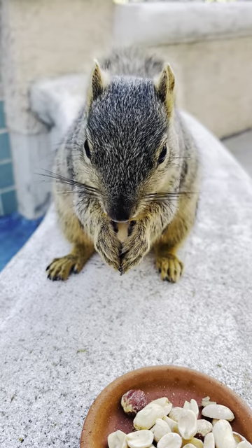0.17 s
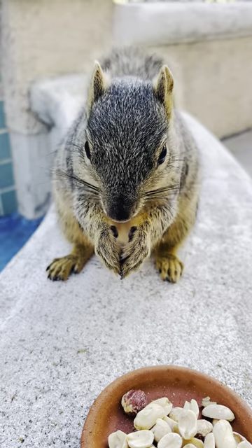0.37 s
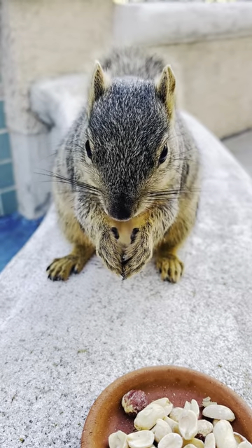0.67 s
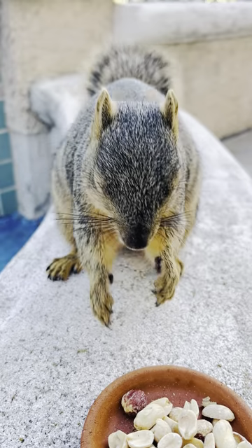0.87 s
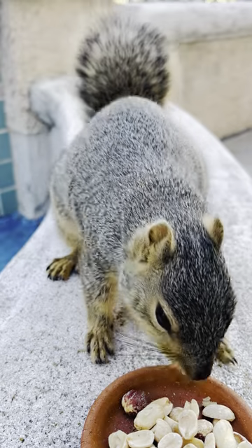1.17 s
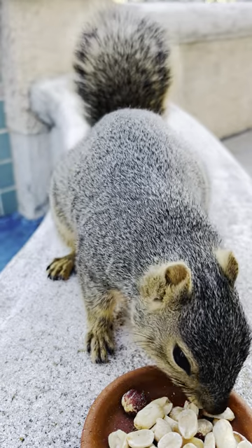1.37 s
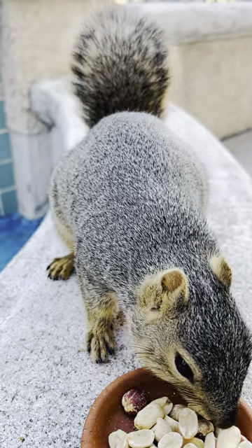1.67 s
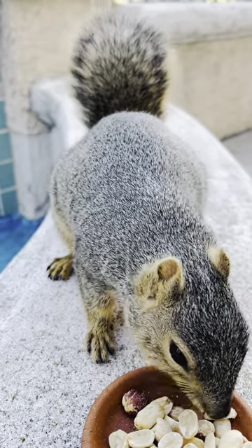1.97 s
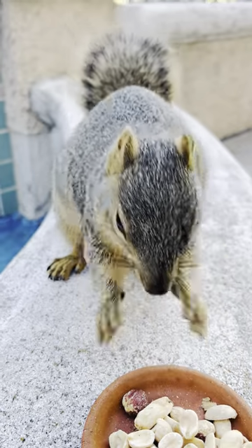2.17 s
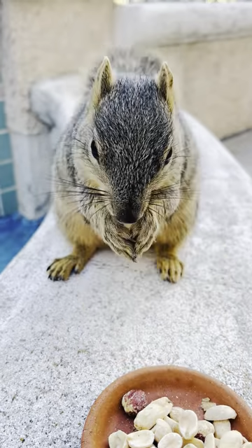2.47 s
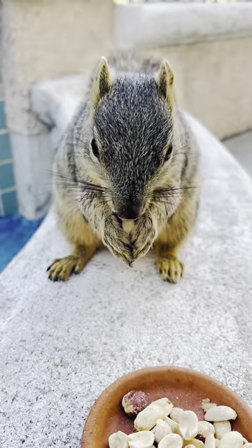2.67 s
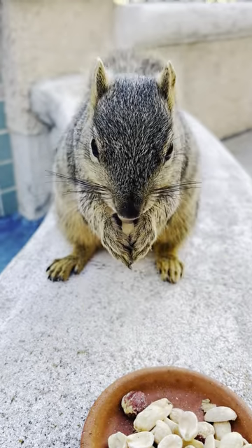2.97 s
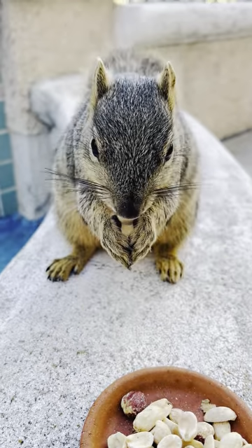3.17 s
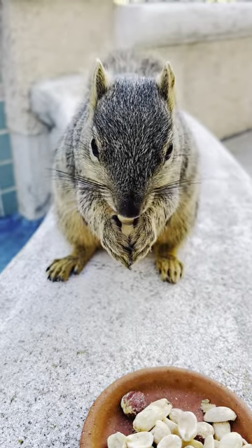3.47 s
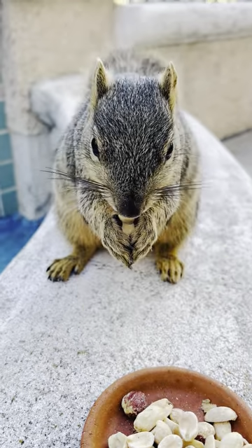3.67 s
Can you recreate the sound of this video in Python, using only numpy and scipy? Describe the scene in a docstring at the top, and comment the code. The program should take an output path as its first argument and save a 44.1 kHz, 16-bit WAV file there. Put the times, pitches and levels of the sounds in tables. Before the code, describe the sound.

A squirrel gnaws peanuts very close to stereo microphones, snapping kernels in brittle clusters, then nuts tap and scrape a clay dish midway before chewing resumes, over low outdoor rumble and faint hums on a patio.

```python
"""First comes a low outdoor rumble with hums; almost at once a squirrel gnaws peanuts close by.
Kernels snap in brittle clusters of noise bursts, its teeth rasp in tiny slips, and its mouth rings.
Midway it noses in a clay dish: nuts tap it as fading tones and scrape it as ringing friction.
Then it chews on. Nearby patio walls answer softly with fading noise."""
import sys
import numpy as np
from scipy import signal
from scipy.fft import rfft, irfft, next_fast_len
from scipy.io import wavfile
from scipy.ndimage import map_coordinates

SR = 44100
rng = np.random.default_rng(int(sys.argv[2]) if len(sys.argv) > 2 else 0)


def unload_wav(signal):
    """Save mono or channel-first audio to the path in sys.argv[1] as 16-bit WAV at rate SR, clipped to [-1, 1]."""
    wavfile.write(
        sys.argv[1],
        SR,
        np.round(np.clip(np.atleast_2d(signal).T, -1, 1) * 32767).astype(np.int16),
    )


N = 168903  # length of the scene in samples


def amp(db):
    """Turn decibels into an amplitude factor."""
    return 10 ** (np.asarray(db) / 20)


def unit(x):
    """Scale a sound to rms 1."""
    return x / np.sqrt(np.mean(x ** 2) + 1e-30)


def along(points, hz):
    """Read a curve of (frequency, value) points on a logarithmic frequency axis."""
    frequency, value = np.transpose(points)
    return np.interp(np.log(hz + 1), np.log(frequency + 1), value)


def wobble(rate):
    """A smooth random curve through `rate` random values a second."""
    knots = rng.standard_normal(int(N * rate / SR) + 4)
    return map_coordinates(knots, [np.arange(N) * rate / SR])


def filtered(x, response):
    """Shape a sound by a response (real or complex) at each frequency."""
    size = next_fast_len(N + SR // 2)
    hz = np.fft.rfftfreq(size, 1 / SR)
    return irfft(rfft(x, size) * response(hz), size)[..., :N]


def add(track, start_s, sound):
    """Mix a short sound into the track at a given time."""
    part = track[max(0, round(start_s * SR)):][:len(sound)]
    part += sound[:len(part)]


def fading_tone(hz, t60, t):
    """A sine that loses 60 dB in t60 seconds, as a damped body rings."""
    return np.sin(2 * np.pi * hz * t) * amp(-60 * t / t60)


SNAP_S = 0.003  # time over which a short sound's energy is counted


def sized(x, db):
    """Give a short sound the energy of that level held for one snap."""
    return x * amp(db) * np.sqrt(SNAP_S * SR / np.sum(x ** 2))


SPLINTER_T60, SPLINTER_DB = 0.021, -12.5  # s, dB against the break itself
COLOUR_SCATTER_DB = 3  # random change of colour from burst to burst


def burst(colour, t60, size=1024):
    """One fracture: fading noise with trailing splinters, through a colour that varies each time."""
    t, hz = np.arange(size) / SR, np.fft.rfftfreq(size, 1 / SR)
    fade = amp(-60 * t / t60) + amp(SPLINTER_DB - 60 * t / SPLINTER_T60)
    drive = rng.standard_normal(size) * fade
    scatter = signal.resample(rng.standard_normal(size=14), len(hz))
    # folding the cepstrum makes the colour causal: nothing sounds before the break
    cepstrum = irfft(np.log(amp(along(colour, hz) + COLOUR_SCATTER_DB * scatter)))
    cepstrum[1:size // 2] *= 2
    cepstrum[size // 2 + 1:] = 0
    return irfft(rfft(drive) * np.exp(rfft(cepstrum)))


GRAIN_SPREAD_DB = 5.5  # how unequal the slips are


def friction(strokes, response, rate):
    """Tiny slips, about `rate` a second, shake a body and swell with each stroke."""
    t = np.arange(N) / SR
    happens = rng.random(N) < rate / SR
    size = amp(GRAIN_SPREAD_DB * np.clip(rng.standard_normal(N), -2, 2))
    slips = happens * rng.choice([-1, 1], N) * size
    power = sum(amp(db) ** 2 * np.exp(-((t - s) / width) ** 2 * 2) for s, width, db in strokes)
    return np.sqrt(power) * unit(filtered(slips, response))


# snaps of the nut, levels before the trims below:
# (time [s], mouth ring [dB], body [dB], brittle edge [dB], splinter fizz [dB])
SNAPS = [(0.0881, -84, -81, -63.5, -60), (0.1049, -54.5, -60, -64, -60), (0.1112, -54.5, -64, -76, -73),
         (0.1171, -58, -65, -77, -72), (0.1926, -62, -62.5, -61, -67), (0.3518, -60, -80, -78, -75),
         (0.3793, -53, -55.5, -56.5, -55), (0.3861, -45, -64, -61, -61), (0.4435, -59, -80, -81, -71),
         (0.4656, -70, -65, -69, -60), (0.5533, -62, -68, -79, -68), (0.7126, -76, -72, -64, -61),
         (0.717, -53, -52, -55, -50), (0.721, -60, -59, -61, -53), (0.8508, -63, -73, -93, -89),
         (0.9, -66, -47.5, -44, -54), (0.9055, -54, -61, -67, -60), (0.9625, -80, -77, -71, -69),
         (1.022, -66, -75, -77, -67), (1.0785, -72, -57.5, -49, -59), (1.0818, -57.5, -75, -55, -50),
         (1.151, -73, -92, -89, -64), (1.2487, -69, -64, -65, -57), (1.2581, -67, -46, -47.5, -43.5),
         (1.2645, -62, -59, -71, -66), (1.4018, -80, -63.5, -76, -83), (1.4336, -72, -63, -72, -69),
         (1.4392, -59, -60.5, -57.5, -59), (1.445, -78, -65, -77, -80), (1.559, -80, -61.5, -76, -78),
         (1.8641, -56, -68, -87, -83), (1.9754, -60, -77, -91, -85), (2.4042, -54.5, -68, -58.5, -55),
         (2.4373, -75, -65.5, -67, -52), (2.4427, -79, -65, -63, -56), (2.4499, -80, -77, -65, -63),
         (2.5311, -62, -50, -52, -55), (2.562, -80, -69, -66, -51), (2.5658, -79, -62, -50, -62),
         (2.5747, -78, -73, -68, -63), (2.7722, -73, -84, -61, -57), (2.778, -53.5, -64, -59, -68),
         (2.8356, -80, -61, -63, -62), (2.876, -79, -85, -65, -62), (2.8801, -54, -66.5, -60, -56),
         (2.95, -56, -53, -62, -49.5), (2.9582, -65, -63, -70, -71), (3.067, -61, -81, -58, -62),
         (3.219, -62, -73, -57, -58), (3.2247, -56, -68, -61, -63), (3.2707, -64, -64, -67, -62),
         (3.2951, -58.5, -59, -70, -69), (3.3049, -56, -64, -69, -66), (3.3455, -80, -79, -66, -68),
         (3.396, -74, -80, -72, -57), (3.411, -54, -77, -57, -59), (3.415, -58, -57.5, -50.5, -48),
         (3.4177, -53, -63, -57, -48), (3.4564, -64, -65, -82, -58), (3.554, -56, -60.5, -78, -83),
         (3.6996, -74, -61, -64.5, -82), (3.7503, -74, -68, -60, -56), (3.7532, -66, -54.5, -48, -44),
         (3.7578, -50, -52.5, -50, -45), (3.766, -72, -78, -67, -65)]
# colours of the body, edge and fizz: (frequency [Hz], relative level [dB])
BODY_COLOUR = [(900, -34), (1700, -3), (3200, -5.5), (3900, -4), (4550, -0.5), (5500, -6), (6500, -2),
               (8000, -35.5)]
EDGE_COLOUR = [(4000, -47), (5800, -5.5), (6700, -2.5), (8200, -9), (9400, -3), (10700, 0.5), (11500, -6),
               (13000, -29), (16500, -32)]
FIZZ_COLOUR = [(5000, -33), (9500, -19), (11000, -5.5), (12000, 0.5), (13500, -0.5), (14500, -5),
               (15400, -5), (16000, -14), (16500, -29)]
MOUTH_HZ, MOUTH_SPREAD = 2330, 0.055  # middle pitch, its random spread as a fraction
MOUTH_T60, MOUTH_RISE_S = 0.0071, 0.00036  # s
BODY_T60, EDGE_T60, FIZZ_T60 = 0.0047, 0.0023, 0.0075  # s
MOUTH_DB, BODY_DB, EDGE_DB, FIZZ_DB = -3, -1.5, 1, -1.5  # trims added to the snap levels


def snaps():
    """Each fracture has a body, a brittle edge and a fizz of splinters, and rings the mouth."""
    out, t = np.zeros(N), np.arange(SR // 40) / SR
    rise = 1 - np.exp(-t / MOUTH_RISE_S)
    for s, mouth_db, body_db, edge_db, fizz_db in SNAPS:
        hz = MOUTH_HZ * np.exp(MOUTH_SPREAD * rng.standard_normal())
        mouth_ring = fading_tone(hz, MOUTH_T60, t) * rise
        add(out, s - MOUTH_RISE_S, sized(mouth_ring, mouth_db + MOUTH_DB))
        add(out, s, sized(burst(BODY_COLOUR, BODY_T60), body_db + BODY_DB))
        add(out, s, sized(burst(EDGE_COLOUR, EDGE_T60), edge_db + EDGE_DB))
        add(out, s, sized(burst(FIZZ_COLOUR, FIZZ_T60), fizz_db + FIZZ_DB))
    return out


# short knocks of the jaw under some bites: (time [s], pitch [Hz], level [dB])
JAW_KNOCKS = [(1.0787, 1600, -53.5), (1.2585, 1490, -54), (1.2644, 1880, -54.5), (2.5311, 1090, -48.5)]
KNOCK_T60 = 0.0098  # s


def jaw_knocks():
    """Under some bites the jaw knocks, as a quickly damped ring."""
    out, t = np.zeros(N), np.arange(SR // 40) / SR
    for s, hz, db in JAW_KNOCKS:
        add(out, s, sized(fading_tone(hz, KNOCK_T60, t), db))
    return out


# strokes of the teeth along the kernel:
# (time at the height [s], time from there to 1/e of the height [s], level [dB])
STROKES = [(.074, 0.0034, -69), (.114, 0.019, -64.5), (.148, .015, -74), (.29, 0.05, -76),
           (.46, 0.026, -70.5), (.492, 0.0089, -72), (.545, .004, -74), (.64, .015, -79),
           (.720, 0.0039, -64), (.82, 0.019, -75.5), (.905, 0.0098, -64), (.955, 0.013, -75),
           (1.083, 0.0088, -66), (1.11, .012, -90), (1.263, 0.009, -69), (1.455, 0.017, -75),
           (1.975, .025, -77), (2.51, 0.021, -73), (2.555, 0.018, -76), (2.767, 0.014, -70),
           (2.80, 0.017, -73), (2.883, .009, -69), (2.932, 0.011, -73), (2.955, 0.011, -64),
           (2.985, 0.018, -71), (3.125, 0.017, -71), (3.228, 0.0086, -65), (3.247, 0.0045, -74),
           (3.30, 0.014, -63), (3.33, 0.011, -70), (3.419, 0.0031, -64.5), (3.466, .01, -77),
           (3.49, 0.017, -71), (3.585, 0.0054, -71.5), (3.696, 0.0023, -66.5), (3.759, 0.0043, -68)]
# colour of the tooth rasp: (frequency [Hz], relative level [dB])
RASP_COLOUR = [(1000, -16), (1900, -15), (2400, 10), (3300, -1.5), (4500, -3), (6500, 0), (8200, -4.5),
               (10800, -5), (13500, -2), (15500, -9), (16400, -26)]


def rasp():
    """Teeth slip along the kernel in many tiny jerks."""
    return friction(STROKES, lambda hz: amp(along(RASP_COLOUR, hz)), rate=1600)


# light ticks, small taps in the dish and dry clicks between bites: (time [s], level [dB])
TICKS = [(.05, -68), (.057, -64), (.202, -77), (.224, -78), (.545, -87), (.563, -71), (1.222, -74),
         (1.454, -64), (1.464, -78), (1.521, -77), (1.54, -70), (1.859, -67), (1.88, -73), (1.899, -74),
         (2.229, -73), (2.714, -76), (2.735, -70), (2.849, -66), (2.896, -63), (3.053, -80), (3.246, -67),
         (3.47, -80), (3.513, -64.5)]
# colour of the ticks and crumbs: (frequency [Hz], relative level [dB])
TICK_COLOUR = [(1500, -36), (3000, -10), (4600, -10), (6500, -2), (8200, -10.5), (10800, -0.5), (13600, 1),
               (15500, -9), (16500, -15)]
CRUMB_COUNT, CRUMB_LAG_S = 2, 0.14  # crumbs after each snap, longest wait
CRUMB_DB, CRUMB_SPREAD_DB = -82, 6.5  # average level, random spread


def ticks_and_crumbs():
    """Light ticks, and faint crumbling that follows each snap, are short noise bursts."""
    out = np.zeros(N)
    events = list(TICKS)
    for row in SNAPS:
        for _ in range(CRUMB_COUNT):
            s = row[0] + CRUMB_LAG_S * rng.random()
            events.append((s, CRUMB_DB + CRUMB_SPREAD_DB * rng.standard_normal()))
    for s, db in events:
        add(out, s, sized(burst(TICK_COLOUR, EDGE_T60), db))
    return out


# ringing modes of the clay dish: (pitch [Hz], relative level before tilt [dB], t60 [s])
DISH_MODES = [(5180, -1, 0.019), (8500, 2.5, 0.015), (2630, -12, 0.0064), (7100, -1.5, 0.0044),
              (10800, -25, 0.0051), (15300, -18, 0.009)]
# nuts tapping the dish: (time [s], level [dB], tilt around the first mode [dB per octave])
TAPS = [(1.5944, -35.5, -4.5), (1.7262, -54.5, 15), (1.4, -58, -6)]
TAP_RISE_S = 0.00025


def dish_taps():
    """A nut's tap sets off the fading modes of the clay, some taps brighter than others."""
    out, t = np.zeros(N), np.arange(SR // 20) / SR
    rise = 1 - np.exp(-t / TAP_RISE_S)
    for s, db, tilt_db in TAPS:
        ring = np.zeros(len(t))
        for hz, level, t60 in DISH_MODES:
            octaves = np.log2(hz / DISH_MODES[0][0])
            ring += amp(level + tilt_db * octaves) * fading_tone(hz, t60, t)
        add(out, s, amp(db) * ring * rise)
    return out


# nuts sliding on the dish:
# (time at the height [s], time from there to 1/e of the height [s], level [dB])
SLIDES = [(1.43, 0.029, -78), (1.54, 0.017, -75), (1.572, 0.012, -73), (1.612, 0.006, -73),
          (1.49, .006, -79), (1.688, 0.011, -69.5), (1.722, 0.024, -64.5), (1.757, 0.011, -67),
          (1.817, 0.016, -73.5), (1.85, 0.011, -64.5), (1.952, .007, -82), (2.028, .007, -64.5)]
# resonances of the scraped clay: (pitch [Hz], width before squaring [Hz], relative level [dB])
SLIDE_RING = [(5260, 170, -4), (8480, 300, 7), (14800, 2000, -15), (3800, 4500, -11), (10700, 3400, -27)]


def dish_slides():
    """Nuts scrape over the clay in tiny slips, coloured by its resonances."""
    def clay(f):
        return sum(amp(db) * np.abs(f * width / (centre ** 2 - f ** 2 + 1j * f * width)) ** 2
                   for centre, width, db in SLIDE_RING)
    return friction(SLIDES, clay, rate=4000)


# fading of the walls' answer, before its colour: (frequency [Hz], t60 [s])
WALL_T60 = [(500, 0.27), (3000, 0.24), (8000, 0.27), (16000, 0.31)]
# colour of the walls' answer: (frequency [Hz], relative level [dB])
WALL_COLOUR = [(2000, 6), (4500, 3.5), (6500, 2.5), (8500, 0), (11000, 1.5), (15000, -8)]
WALL_WIDTH = 0.18  # share of the sideways part


def walls(x, count=12):
    """A soft diffuse answer from the patio walls, drawn anew for each of `count` equal parts."""
    out = np.zeros((2, N + SR))
    for part in np.array_split(np.arange(N), count):
        # noise that fades at its own speed in each frequency band
        hz, t, bands = signal.stft(rng.standard_normal((2, SR // 2)), SR, nperseg=256)
        fade = amp(-60 * t / along(WALL_T60, hz)[:, None])
        tail = signal.istft(bands * fade, SR, nperseg=256)[1]
        wet = signal.fftconvolve(x[None, part], tail / np.linalg.norm(tail[0]), axes=1)
        out[:, part[0]:part[0] + wet.shape[1]] += wet
    mid, side = filtered(out[:, :N], lambda hz: amp(along(WALL_COLOUR, hz)))
    return np.array([mid + WALL_WIDTH * side, mid - WALL_WIDTH * side])


# likeness of left and right in the background noise: (frequency [Hz], likeness [0 to 1])
ALIKE = [(30, 1), (110, 1), (180, 0.98), (330, 0.88), (700, 0.52), (1400, 0.59), (3000, .6), (6000, 0.75),
         (12000, 0.81)]


def rush(spectrum):
    """Stereo noise of rms 1, nearly mono in the bass."""
    def mid_and_side(hz):
        turn = np.arccos(np.clip(along(ALIKE, hz), -1, 1)) / 2
        return amp(along(spectrum, hz)) * [np.cos(turn), np.sin(turn)]
    mid, side = filtered(rng.standard_normal((2, N)), mid_and_side)
    return unit(np.array([mid + side, mid - side]))


def tone(hz, wander_hz, rate, waver_db):
    """A tone of rms 1 whose pitch and level drift at random."""
    phase = 2 * np.pi * np.cumsum(hz + wander_hz * wobble(rate)) / SR
    return unit(np.sin(phase) * amp(waver_db * wobble(rate)))


# level of the main hum, before its waver: (time [s], level [dB])
HUM_LEVEL = [(0, -69), (.4, -81), (.53, -52), (.75, -61.5), (.92, -57), (1.1, -73), (1.6, -80), (1.75, -59),
             (1.92, -64), (2.1, -55.5), (2.35, -63), (2.48, -66), (2.62, -54), (2.74, -49), (2.84, -55),
             (2.95, -66), (3.8, -57.5)]


def hums():
    """Two wavering hums, a low throb and a higher whine that fades early."""
    t = np.arange(N) / SR
    hum = amp(np.interp(t, *np.transpose(HUM_LEVEL))) * tone(292.3, 1.25, 12, waver_db=2)
    drone = amp(-62) * tone(227.7, 6.94, 16, waver_db=3)
    throb = amp(-54.5) * tone(73.8, 6.68, 22, waver_db=2)
    whine_fade = np.exp(-(t / 0.31) ** 4)  # down to 1/e at 0.31 s
    whine = amp(-57.5) * whine_fade * tone(562.6, 6.2, 12.4, waver_db=4)
    return hum + drone + throb + whine


# spectra of the rumble and the thin air: (frequency [Hz], relative level [dB per Hz])
RUMBLE = [(12, -51), (20, -24), (58, -0.5), (76, 0.5), (145, -8), (221, -7.5), (262, -12.5), (294, -11),
          (323, -11.5), (406, -16), (583, -12.5), (641, -15.5), (822, -16.5), (1090, -22), (1300, -21.5),
          (1900, -35.5), (2470, -70), (4180, -120)]
AIR = [(1200, -21), (1700, -1.5), (2000, 1), (2600, -8), (3400, -19), (5000, -22.5), (7000, -24),
       (11000, -28.5), (16000, -32)]
RUMBLE_DB, AIR_DB = -46.5, -73.5  # rms levels


def outdoors():
    """Distant rumble and thin air are coloured noise, with the hums on top."""
    return amp(RUMBLE_DB) * rush(RUMBLE) + amp(AIR_DB) * rush(AIR) + hums()


# left level minus right level: (frequency [Hz], difference [dB])
BALANCE = [(1500, 0), (2400, -3.5), (4500, -4), (6400, 0), (15000, 0)]
# how far the left is ahead of the right: (frequency [Hz], phase [radians])
PORT_PHASE = [(0, 0), (1700, 0), (2250, .5), (2900, 2), (3600, .8), (4700, .7), (5200, 1.3), (6000, 3.1),
              (8350, 5.7), (9900, 6.9), (11800, 8.9), (14200, 11.1), (16200, 12.6)]


def microphones(x):
    """Two close microphones hear each frequency at slightly different levels and phases."""
    half = np.array([[.5], [-.5]])  # half the difference goes to each side

    def ports(hz):
        phase = np.interp(hz, *np.transpose(PORT_PHASE))
        return amp(half * along(BALANCE, hz)) * np.exp(1j * half * phase)
    return filtered(x, ports)


SNAP_WET_DB, RASP_WET_DB, DISH_WET_DB = -19.5, -7, -23  # sent to the walls


def scene():
    """The squirrel, its dish and the background, heard by two close microphones."""
    bites = snaps() + jaw_knocks() + ticks_and_crumbs()
    teeth = rasp()
    clay = dish_taps() + dish_slides()
    to_walls = amp(SNAP_WET_DB) * bites + amp(RASP_WET_DB) * teeth + amp(DISH_WET_DB) * clay
    near = bites + teeth + clay + walls(to_walls)
    return microphones(near + outdoors())


TOP_HZ = 16500  # band limit


def record(dry):
    """Nothing is kept at or above the band limit."""
    return filtered(dry, lambda hz: hz < TOP_HZ)


dry = scene()
out = record(dry)
unload_wav(out)
```